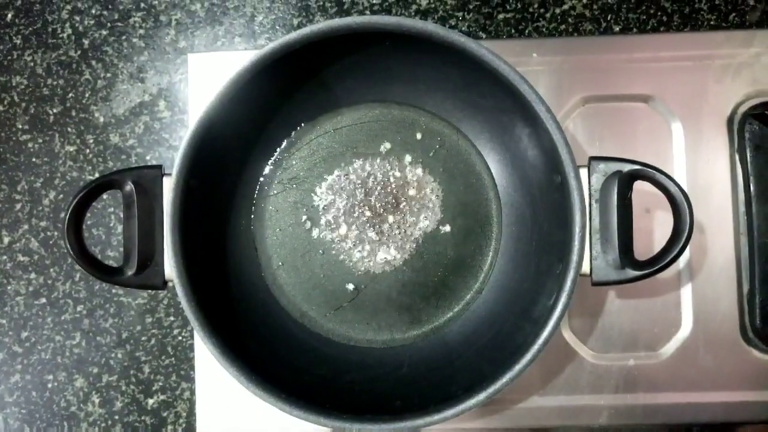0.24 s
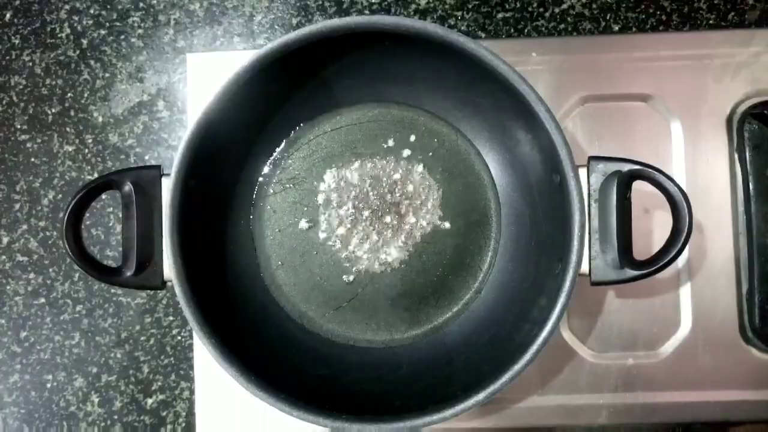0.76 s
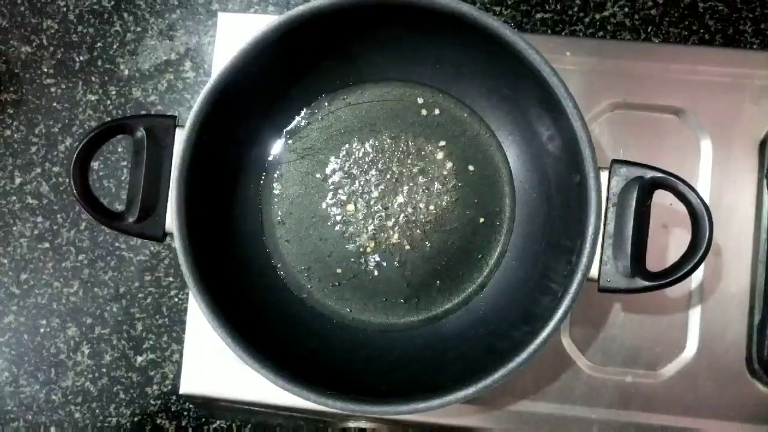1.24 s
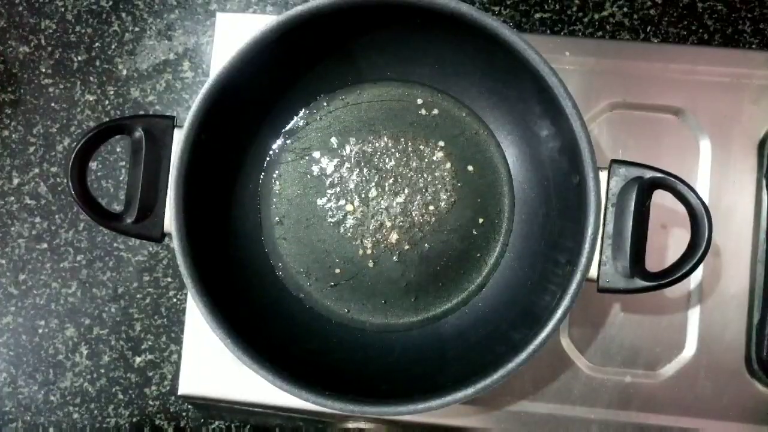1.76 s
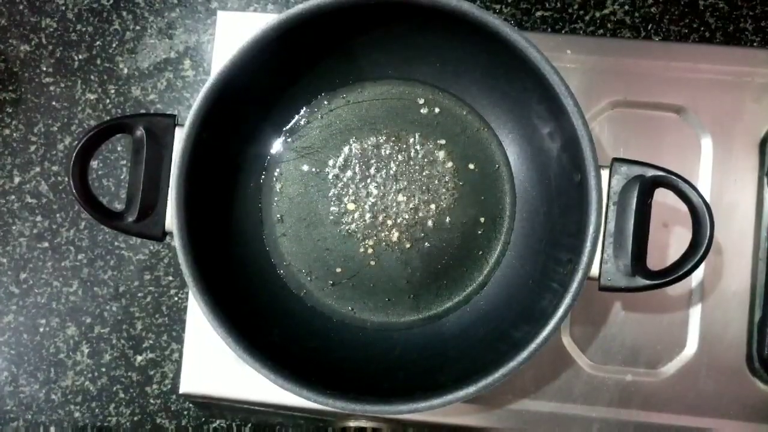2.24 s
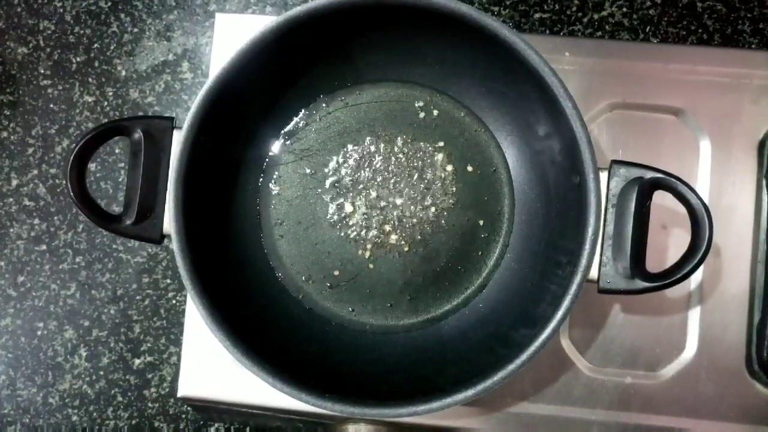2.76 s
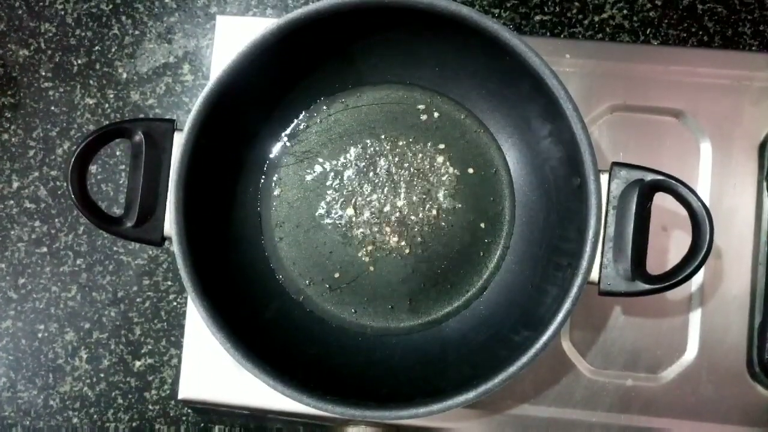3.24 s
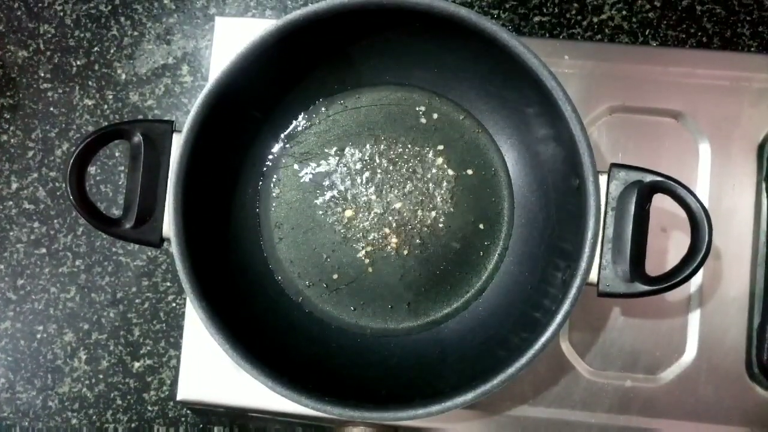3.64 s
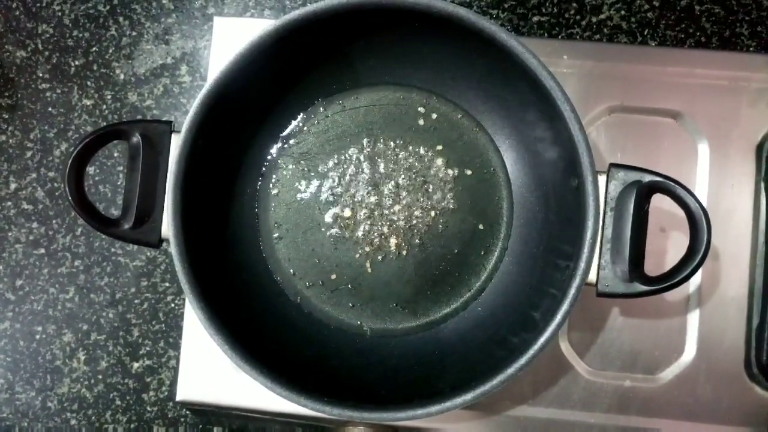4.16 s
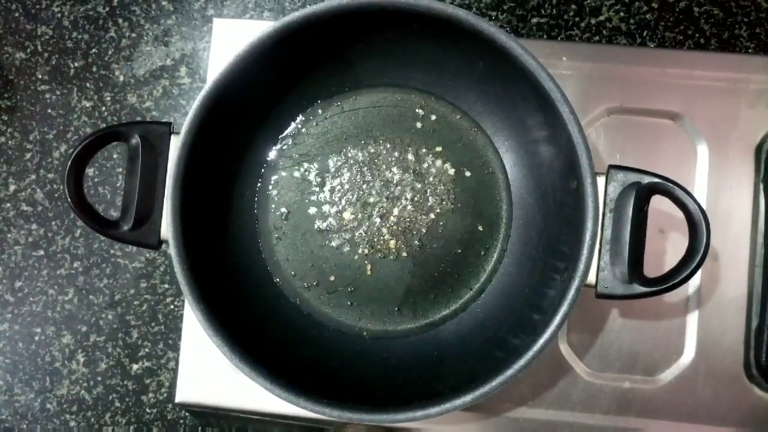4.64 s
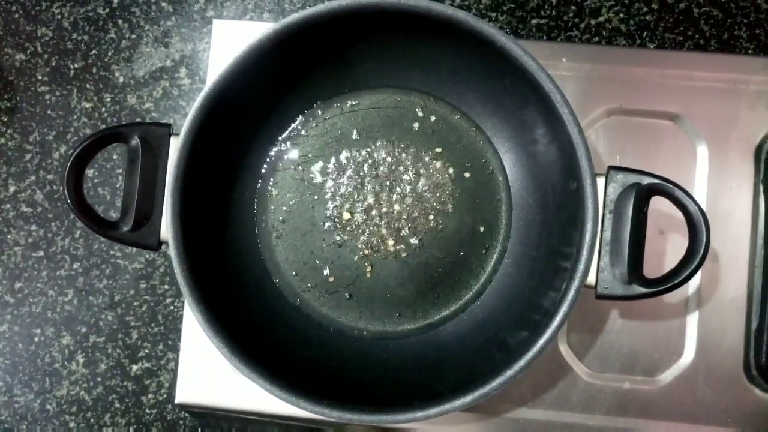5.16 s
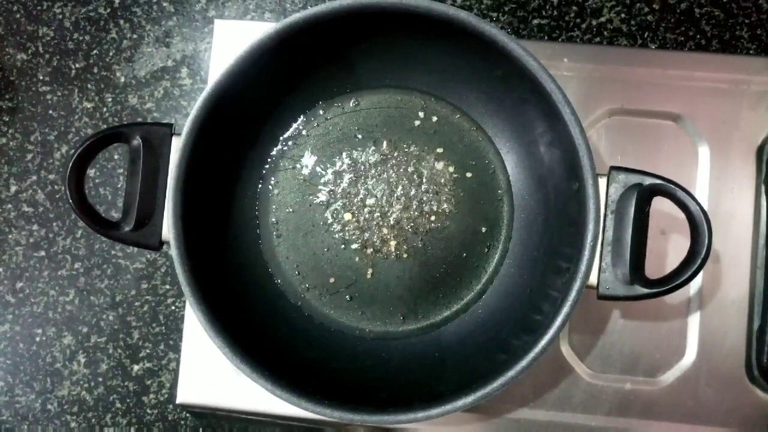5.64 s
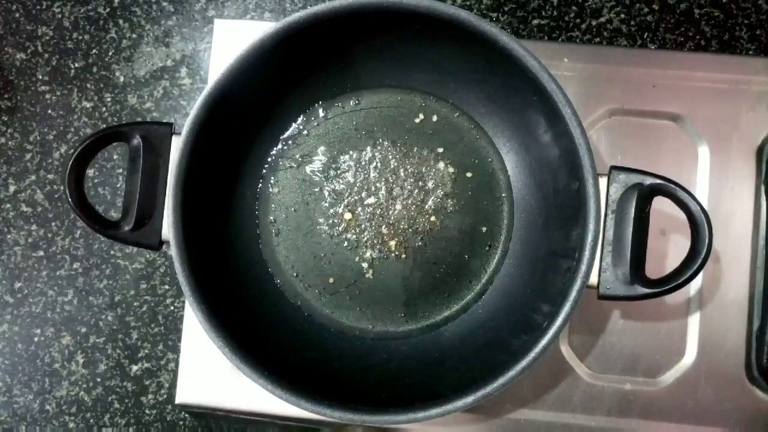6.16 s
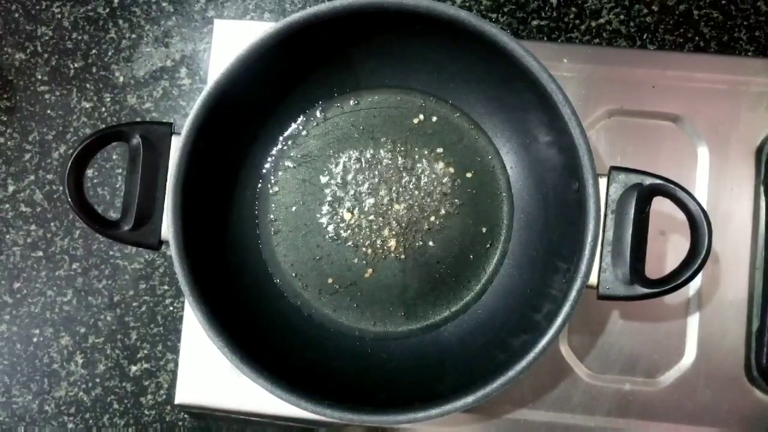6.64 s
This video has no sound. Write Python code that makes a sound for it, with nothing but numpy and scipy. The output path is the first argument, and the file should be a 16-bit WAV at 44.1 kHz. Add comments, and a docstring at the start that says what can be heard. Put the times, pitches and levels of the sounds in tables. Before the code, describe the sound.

Seeds and lentils fry in oil. At first there is only a faint, fine hiss with breathy wheezes and a low flame roar. At about 1.4 seconds, sharp steam pops start abruptly and keep coming, dozens each second, uneven in loudness, over sizzling and sputtering oil. The close stereo pickup favours the left, with little room echo and a softened extreme top.

```python
"""A kitchen stove: mustard seeds and lentils fry in hot oil in a metal pot. At first a fine hiss with faint
wheezes lies over the burner, coloured noise with a low rumble. Then steam bursts from the seeds in sharp pops,
noise jets and clicks ringing a damped cavity; wet spurts of filtered noise and gurgles of short rising tones
join a bed of fizz made of noise and tiny spits. The left microphone faces the pot; the right one hears the
bursts weaker and smeared, in its own duller colour."""
import sys
import numpy as np
from scipy import signal
from scipy.fft import rfft, irfft, next_fast_len
from scipy.io import wavfile

SR = 44100
rng = np.random.default_rng(int(sys.argv[2]) if len(sys.argv) > 2 else 0)


def bounce(signal):
    """Save signal as a 16-bit WAV file at the path given by the first command-line argument."""
    frames = np.transpose(np.atleast_2d(signal))
    limited = np.clip(frames, -1, 1)
    pcm = np.round(limited * 32767).astype(np.int16)
    wavfile.write(sys.argv[1], SR, pcm)


N = 304731
TIME = np.arange(N) / SR
FREQS = np.maximum(np.arange(N // 2 + 1) * SR / N, 1)

# loud bursts of steam pockets: (time [s], level before trim [dB], pitch [Hz], treble snap [dB])
LOUD_POPS = [(1.385, -24, 4240, -18), (1.404, -29, 5460, -11), (1.4216, -29, 5170, -11),
             (1.4467, -34, 5450, -14), (1.454, -29.5, 4500, -7.5), (1.5082, -29, 5300, -9),
             (1.5524, -29, 5650, -5.5), (1.5935, -30, 5520, -9), (1.6189, -35.5, 5430, -10),
             (1.6775, -24, 5500, -15), (1.7271, -23.5, 5470, -6), (1.7964, -29, 5870, -20),
             (1.8821, -29.5, 5200, -6), (1.9454, -27.5, 5250, -12.5), (2.0003, -26.5, 5950, -10),
             (2.009, -32, 5800, -11), (2.0254, -18, 5080, -26), (2.0771, -27.5, 5220, -20),
             (2.1363, -24.5, 3800, -22), (2.1514, -22.5, 3920, -26), (2.2225, -23, 5070, -17),
             (2.2608, -30.0, 5520, -9), (2.2752, -29, 5390, -10), (2.2854, -34, 5740, -7.5),
             (2.3337, -28.5, 5900, -12), (2.3589, -30.5, 5580, -6), (2.4712, -25, 6100, -9),
             (2.528, -19, 4060, -28), (2.5358, -26.5, 5150, -16), (2.5975, -22.5, 5170, -7.5),
             (2.648, -24.5, 5260, -10), (2.6589, -23.5, 5290, -14), (2.6813, -31, 5450, -19),
             (2.7402, -24.5, 5420, -18), (2.7804, -26.0, 4620, -24), (2.7924, -29.5, 5480, -7),
             (2.8654, -32.5, 6030, -6), (2.8715, -32, 5420, -17), (2.902, -18, 5240, -11),
             (2.92, -28, 5350, -14), (2.9275, -31, 5420, -6), (3.0279, -19.5, 4240, -16.5),
             (3.0477, -30, 5440, -12), (3.095, -19, 5560, -14), (3.118, -26.5, 4700, -16),
             (3.2171, -23, 5570, -9), (3.2688, -24.5, 5300, -11), (3.3009, -27.5, 5200, -20),
             (3.3671, -17.5, 4160, -25), (3.375, -29, 4800, -16), (3.4047, -26, 5720, -16),
             (3.4338, -20.5, 5900, -28), (3.4855, -18.5, 4680, -22), (3.494, -26.0, 5550, -21),
             (3.526, -21.5, 4900, -13), (3.5346, -29.5, 5350, -9), (3.5746, -26.5, 5940, -12),
             (3.5975, -22.5, 4270, -17), (3.643, -24, 5600, -24), (3.6577, -20, 5700, -18),
             (3.6753, -27, 5000, -24), (3.6998, -26.5, 5730, -18), (3.7103, -29, 5670, -8),
             (3.7342, -27.0, 4330, -24), (3.7672, -33, 5300, -22), (3.817, -33, 5560, -3),
             (3.873, -29.5, 4870, -9), (3.8811, -21.5, 4380, -17), (3.8895, -20.5, 4900, -16),
             (3.9033, -26, 5280, -11), (3.9151, -29, 5900, -6), (3.9392, -25.5, 5160, -14),
             (3.9654, -28.0, 4960, -18), (3.9805, -26.5, 5170, -11), (4.0231, -21.5, 4930, -27),
             (4.0357, -30.5, 5560, -21), (4.0862, -20, 4670, -17), (4.1469, -26, 5300, -24),
             (4.173, -27.0, 5100, -19), (4.2304, -26, 5560, -11), (4.2783, -18.5, 4550, -29),
             (4.2912, -26, 5900, -11), (4.3308, -30, 5460, -6), (4.365, -32, 5890, -14),
             (4.3726, -28, 4990, -17), (4.3864, -28, 5190, -19), (4.397, -25, 4740, -15),
             (4.4367, -25.5, 5350, -23), (4.4614, -24, 5700, -15), (4.5794, -23, 4880, -20),
             (4.6387, -26, 4670, -16), (4.6598, -20.5, 4700, -14.5), (4.687, -22, 5330, -13),
             (4.7065, -27.5, 5410, -17), (4.7533, -25.5, 5160, -12), (4.7837, -25.5, 5100, -15),
             (4.9363, -18.5, 5870, -6), (4.9816, -20.5, 5330, -15), (5.04, -26.5, 5230, -9),
             (5.0758, -26, 5360, -14), (5.0912, -18, 4970, -14), (5.1034, -29, 5090, -6),
             (5.1187, -36.5, 5780, 4), (5.2293, -28.0, 5300, -8), (5.2451, -30, 5760, -12),
             (5.2672, -28.5, 5680, -11), (5.2975, -25.5, 4470, -11), (5.307, -18, 5130, -21),
             (5.3255, -20.5, 4910, -17), (5.3467, -24, 5250, -22), (5.399, -22, 5350, -13),
             (5.4163, -19.5, 4920, -19), (5.4263, -28, 5200, -19), (5.4755, -23.5, 5440, -22),
             (5.5577, -28, 4880, -20), (5.6197, -26, 5400, -12), (5.629, -32, 4750, -6),
             (5.6726, -29.5, 5600, -8), (5.7093, -29.5, 4980, -13), (5.723, -31, 5300, -15),
             (5.7972, -20.5, 4830, -27), (5.8285, -29, 5530, -16), (5.9253, -26.5, 5570, -10),
             (5.9568, -24.5, 5160, -13), (5.9993, -28, 5150, -17), (6.0196, -25.0, 5460, -13),
             (6.0655, -22.5, 5670, -13), (6.1262, -22.5, 4700, -13), (6.1944, -32, 5700, -24),
             (6.2084, -22.5, 5230, -31), (6.2503, -29, 5940, -9), (6.2928, -25, 5500, -14),
             (6.3006, -30, 5020, -10), (6.3337, -24, 5660, -14), (6.3798, -24.5, 5700, -11),
             (6.4348, -19.5, 4300, -16.5), (6.4573, -23, 5200, -21), (6.5133, -26, 5640, -5.5),
             (6.5392, -29, 5140, -21), (6.5538, -22, 5200, -16), (6.5641, -29, 5050, -22),
             (6.5893, -20.5, 5370, -20), (6.597, -25, 5200, -22), (6.6132, -25.5, 4560, -11),
             (6.6612, -26, 5090, -16), (6.6694, -23.5, 4900, -21), (6.6988, -25.5, 5150, -11),
             (6.7221, -27.0, 5220, -16), (6.729, -31, 4980, -13), (6.8245, -25, 5040, -14.5),
             (6.8696, -21.0, 5220, -34)]
POPPING_FROM_S = 1.382  # the popping begins
SMALL_POP_HZ = 5300  # typical pitch of a lesser burst, and the yardstick for the size of every burst


def from_db(db):
    """Decibels to gain."""
    return 10 ** (np.asarray(db) / 20)


def rms_one(x):
    """Scale to unit power."""
    return x / np.sqrt(np.mean(x ** 2) + 1e-20)


def in_time(rows):
    """Each column of a curve at every sample."""
    s, *columns = np.transpose(rows)
    return [np.interp(TIME, s, c) for c in columns]


def over_hz(points):
    """A spectrum table at every frequency, joined along a log pitch axis."""
    hz, value = np.transpose(points)
    return np.interp(np.log(FREQS), np.log(hz), value)


def colour(x, curve_db):
    """Filter by a gain given at every frequency."""
    size = next_fast_len(N, True)
    gain = np.interp(np.arange(size // 2 + 1) * SR / size, FREQS, from_db(curve_db))
    return irfft(rfft(x, size) * gain, size)[..., :N]


def band(x, low_hz, high_hz, order=2):
    """Causal band-pass."""
    edges_hz = [low_hz, min(high_hz, SR / 2 - 1)]
    return signal.sosfilt(signal.butter(order, edges_hz, "band", fs=SR, output="sos"), x)


def drift(rate):
    """Slow random curve of spread 1: noise rolled off above rate [Hz]."""
    step, size = 40, 8192  # samples between points, number of points
    hz = np.arange(size // 2 + 1) * SR / step / size
    slow = irfft(rfft(rng.standard_normal(size)) / (1 + (hz / rate) ** 2))
    return np.interp(np.arange(N) / step, np.arange(size), rms_one(slow))


def diffuse_noise():
    """Stereo noise, alike in the bass and nearly unrelated in the treble."""
    # likeness of the two microphones: (frequency [Hz], correlation [0-1])
    likeness = [(70, 1), (130, 0.92), (300, 0.87), (630, 0.78), (1200, 0.15), (3000, 0.06)]
    alike = np.clip(over_hz(likeness), 0, 1)
    mid, side = rfft(rng.standard_normal((2, N)))
    return irfft(np.sqrt(1 + alike) * mid + np.sqrt(1 - alike) * side * [[1], [-1]], N)


def hollows_db():
    """The lift that the hollow resonances give at every frequency."""
    # hollows of pot and stove: (centre [Hz], width [Hz], lift [dB])
    hollows = [(269, 38, 4.5), (347, 11, 10.5), (523.8, 10.4, 7.5), (611.2, 33, 9.5), (1107, 52, 7.5),
               (1582, 51, 9), (2110, 200, 8)]
    return sum(db / (1 + (2 * (FREQS - hz) / width) ** 2) for hz, width, db in hollows)


def burner():
    """The flame's roar sounds through the hollows of pot and stove, over a low rumble; both flicker."""
    # low background levels, mostly lower from 1.4 s on:
    # (time [s], roar before trim [dB], rumble before trim [dB])
    flame_levels = [(0.0, -45.5, -52), (0.96, -44.5, -48), (1.38, -43, -53), (1.42, -51.5, -57.5),
                    (2.02, -49, -52), (3.35, -51, -55.5), (3.37, -43, -47), (3.39, -53.5, -55.5),
                    (4.11, -51.5, -57.5), (4.15, -41.5, -50), (4.2, -52, -55), (4.73, -49, -57.5),
                    (4.93, -50, -53), (5.5, -52, -57), (5.58, -43, -50.5), (5.7, -55.5, -64),
                    (5.75, -46.5, -55), (6.37, -50, -54), (6.91, -51.5, -55.5)]
    # flame spectrum ahead of the hollows: (frequency [Hz], relative level [dB])
    roar_spectrum = [(60, -31), (150, -9), (200, -0.5), (250, 1), (350, 0.5), (480, -2), (750, -4),
                     (1300, -8), (2200, -13.5), (4000, -16), (9000, -33), (13500, -47)]
    # low rumble spectrum: (frequency [Hz], relative level [dB])
    rumble_spectrum = [(20, -6), (38, -26), (50, 0.5), (58, -8), (72, 5), (86, -4), (104, 7.5), (122, -1),
                       (145, -17), (260, -55)]
    roar_db, rumble_db = in_time(flame_levels)
    roar = rms_one(colour(diffuse_noise(), over_hz(roar_spectrum) + hollows_db()))
    rumble = rms_one(colour(diffuse_noise(), over_hz(rumble_spectrum)))
    flicker_db = 1.16 * drift(rate=20.0)
    roar_gain = from_db(roar_db + 1.0 + flicker_db)
    rumble_gain = from_db(rumble_db + 2.0 + .5 * flicker_db)
    return roar_gain * roar + rumble_gain * rumble


def wheezes():
    """Short, breathy swells of narrow hiss."""
    # faint wheezes in the early hiss: (time [s], level [dB], pitch [Hz])
    wheeze_rows = [(.26, -49, 4490), (.33, -52.5, 3800), (.86, -50.5, 3890)]
    out = 0
    for s, level_db, hz in wheeze_rows:
        hiss = rms_one(band(rng.standard_normal((2, N)), hz / 1.022, hz * 1.022))
        swell = np.exp(-((TIME - s) / 0.066) ** 2)
        out = out + from_db(level_db) * hiss * swell
    return out


def oil_levels():
    """Fizz and sputter in dB: powers of the simmer, the steady bed and spurts that rise fast, hold and die away."""
    # steady bed of frying: (time [s], fine fizz before trim [dB], wet sputter before trim [dB])
    bed_levels = [(1.4, -36, -40.5), (1.6, -38, -46), (1.87, -43, -48), (2.08, -38, -60.0), (2.3, -39, -55),
                  (2.75, -36.5, -61), (2.97, -42, -47), (3.2, -39, -44), (3.55, -36, -48), (3.8, -39, -56),
                  (4.2, -33.5, -48), (4.55, -38.5, -50), (4.9, -41.5, -53), (5.25, -33.5, -46),
                  (5.68, -44.5, -55), (6.1, -38, -47.5), (6.45, -42, -48.5), (6.91, -39, -54.9)]
    # a seed splits and vents its moisture in a spurt:
    # (time [s], length [s], fine fizz before trim [dB], wet sputter before trim [dB])
    spurt_rows = [(1.647, 0.062, -37.5, -44.5), (2.006, 0.054, -32, -40.5), (2.118, 0.041, -48, -34.5),
                  (2.47, 0.025, -34.5, -58.0), (2.516, 0.009, -44, -33.5), (2.633, 0.027, -41, -42),
                  (2.893, 0.026, -43, -58.0), (3.033, 0.051, -36.5, -44.7), (3.11, 0.028, -36, -45),
                  (3.356, 0.005, -33, -32.5), (3.446, 0.019, -39, -54), (3.584, 0.079, -37, -38),
                  (3.66, 0.018, -33, -32), (3.698, 0.057, -37, -39), (3.861, 0.011, -31, -32),
                  (4.019, 0.024, -29.5, -43.9), (4.126, 0.022, -50, -40.5), (4.441, 0.024, -32.5, -33),
                  (4.633, 0.028, -44, -36.5), (4.764, 0.066, -36.5, -42.5), (4.955, 0.086, -36, -53),
                  (5.328, 0.018, -36, -33.2), (5.408, 0.016, -30.5, -42), (5.545, 0.025, -39, -37.5),
                  (5.798, 0.019, -39, -58), (5.914, 0.007, -34, -45), (5.945, 0.034, -36, -40),
                  (6.534, 0.054, -35.5, -42.5), (6.576, 0.11, -36.7, -46), (6.843, 0.014, -33.3, -60)]
    simmer_fizz_db, simmer_sputter_db = -44, -51.5  # the hiss that the hot oil always keeps up
    attack_s, release_s = 0.011, 0.042
    bed_db, wet_bed_db = in_time(bed_levels)
    popping = TIME > POPPING_FROM_S
    fizz = from_db(simmer_fizz_db) ** 2 + popping * from_db(bed_db) ** 2
    sputter = from_db(simmer_sputter_db) ** 2 + popping * from_db(wet_bed_db) ** 2
    for s, length_s, fizz_db, sputter_db in spurt_rows:
        rise = np.clip((TIME - s) / attack_s, 0, 1)
        flow = rise * np.exp(-np.clip((TIME - s - length_s) / release_s, 0, 20))
        fizz = fizz + (from_db(fizz_db) * flow) ** 2
        sputter = sputter + (from_db(sputter_db) * flow) ** 2
    return 10 * np.log10(fizz), 10 * np.log10(sputter)


def crackle(per_s, spread_db, jet_ms):
    """Pinhead bubbles bursting at the surface: very short noise ticks of uneven strength."""
    at = np.flatnonzero(rng.random(N) < per_s / SR)
    powers = from_db(spread_db * np.minimum(rng.exponential(1, len(at)), 2.5)) ** 2
    fade = np.exp(-1000 / (jet_ms * SR))
    envelope = np.sqrt(signal.lfilter([1], [1, -fade], np.bincount(at, powers, N) + 1e-18))
    return rms_one(envelope * rng.standard_normal((2, N)))


def bubbles(per_s, spread_db, width, jet_ms, count=16):
    """Small spits of uneven strength at random moments, each a brief noise jet in one of many pitch bands."""
    at = np.flatnonzero(rng.random(N) < per_s / SR)
    powers = from_db(spread_db * np.minimum(rng.exponential(1, len(at)), 3)) ** 2
    dealt = rng.integers(0, count, len(at))  # the band of each spit
    out = np.zeros((2, N))
    fade = np.exp(-1000 / (jet_ms * SR))
    for k, hz in enumerate(np.geomspace(1500, 12000, count)):
        starts = np.bincount(at[dealt == k], powers[dealt == k], N) + 1e-18
        envelope = np.sqrt(signal.lfilter([1], [1, -2 * fade, fade ** 2], starts))
        jets = envelope * rng.standard_normal((2, N))
        out += band(jets, hz / (1 + width), hz * (1 + width))
    return rms_one(out)


def patchy(x, depth_db, rate, count=14):
    """Each narrow band swells and fades on its own, at random."""
    size = next_fast_len(N, True)
    spectrum, hz = rfft(x, size), np.arange(size // 2 + 1) * SR / size
    centres = np.geomspace(1200, 13000, count)
    # overlapping triangles that add up to the whole spectrum
    bands = (irfft(spectrum * np.interp(hz, centres, one), size)[:, :N] for one in np.eye(count))
    return sum(part * from_db(depth_db * drift(rate)) for part in bands)


def frying(fizz_db, sputter_db, lively):
    """Fine bubbles fizz and larger ones sputter; the livelier the oil, the more single spits stand out."""
    # fine fizz: (frequency [Hz], relative level [dB])
    fizz_spectrum = [(700, -11), (2000, -8), (3200, -11), (3900, -0.5), (5000, 3.5), (5750, 6), (6600, -2),
                     (7150, -13), (8000, -16.5), (9500, -12), (11500, -13.5), (13000, -19.5), (13500, -62)]
    # wet sputter ahead of the hollows: (frequency [Hz], relative level [dB])
    sputter_spectrum = [(500, -15.5), (1100, -5), (1600, -26), (2150, -9), (2700, -1.5), (3350, 6.5),
                        (4100, 3), (5500, -57), (9000, -62)]
    ticks = lively * crackle(per_s=100, spread_db=-9.0, jet_ms=1.0)
    spits = lively * bubbles(per_s=600, spread_db=-0.8, width=0.16, jet_ms=0.83)
    plops = lively * bubbles(per_s=460, spread_db=0.5, width=0.083, jet_ms=1.0)
    fine = 0.64 * rng.standard_normal((2, N)) + .7 * spits + 0.46 * ticks
    wet = 1.11 * rng.standard_normal((2, N)) + 1.38 * plops + 0.043 * ticks
    fizz = from_db(fizz_db - 1.53) * rms_one(colour(fine, over_hz(fizz_spectrum)))
    wet_colour_db = over_hz(sputter_spectrum) + hollows_db()
    sputter = from_db(sputter_db - 1.2) * rms_one(colour(wet, wet_colour_db))
    clumps = from_db(0.71 * lively * drift(rate=15))  # bubbles come in clusters
    return clumps * patchy(fizz + sputter, depth_db=1.28 + 1.27 * lively, rate=17.0)


def puffs(sputter_db):
    """Dull air noise in the hollows of the pot follows the sputter, so the wettest spurts puff most."""
    air = rms_one(colour(band(diffuse_noise(), 140, 1100, order=2), hollows_db()))
    return from_db(sputter_db - 14) * air


def gurgles():
    """A crevice blows a quick string of bubbles of nearly one size; each rings briefly, rising in pitch."""
    # strings of ringing bubbles: (time [s], length [s], level before the ring's envelope [dB], pitch [Hz])
    gurgle_rows = [(2.132, 0.035, -36, 3420), (3.66, 0.1, -42, 3420), (4.132, 0.034, -27, 3410),
                   (4.456, 0.035, -37.5, 2070), (4.441, 0.042, -31, 3040), (5.341, 0.04, -38, 3450)]
    bubbles_per_s, ring_s = 300, 0.0068
    scatter_octaves, rise_per_s = 0.069, 1  # scatter either way; rise as a share of the pitch
    out, t = np.zeros((2, N + SR)), TIME[:SR // 25]
    for s, length_s, level_db, hz in gurgle_rows:
        count = max(round(bubbles_per_s * length_s), 1)
        for when, size, left, right in rng.random((count, 4)):
            pitch = hz * 2 ** (scatter_octaves * (2 * size - 1))
            start_phase = np.array([[left], [right]])
            phase = 2 * np.pi * (pitch * t * (1 + rise_per_s * t / 2) + start_phase)
            ring = np.sin(phase) * (np.exp(-t / ring_s) - np.exp(-10 * t / ring_s))
            start = round((s + when * length_s) * SR)
            out[:, start:start + len(t)] += from_db(level_db) * ring
    return out[:, :N]


def dips():
    """Gain of the background: brief smooth dips, a short one round each loud burst, and a fast flutter."""
    # brief dips of the whole background: (time [s], half length [s], depth [dB])
    dip_rows = [(1.427, 0.036, 7.5), (1.878, 0.033, 7), (2.362, 0.018, 8), (2.497, 0.027, 8),
                (2.895, 0.014, 3.5), (3.347, 0.005, 7.5), (4.181, 0.019, 7.5), (4.336, 0.017, 6),
                (4.529, 0.018, 9), (5.394, 0.0042, 11), (5.632, 0.017, 7), (5.694, 0.011, 7),
                (6.701, 0.012, 15)]
    pop_dip_db, pop_dip_s, pop_dip_lead_s = 3, 0.007, 0.0021  # depth, half length, how early
    dip_db = sum(depth_db * np.exp(-((TIME - s) / half_s) ** 2) for s, half_s, depth_db in dip_rows)
    centres = np.sort(np.array(LOUD_POPS)[:, 0]) - pop_dip_lead_s
    nearest = centres[np.searchsorted((centres[1:] + centres[:-1]) / 2, TIME)]
    dip_db = np.maximum(dip_db, pop_dip_db * np.exp(-((TIME - nearest) / pop_dip_s) ** 2))
    flutter_db = 2.5 * drift(rate=52) * (TIME > POPPING_FROM_S)
    return from_db(flutter_db - dip_db)


def kitchen(x, t60, echo_s, echo_db, tail_db):
    """One echo from a near wall, then the diffuse ring of a small hard room."""
    t = TIME[:SR // 2]
    tail = rng.standard_normal((2, len(t))) * from_db(-60 * t / t60) * (t > echo_s)
    echo = rng.standard_normal((2, len(t))) * np.exp(-np.abs(t - echo_s) / 0.0005)
    response = (from_db(tail_db) * rms_one(tail) + from_db(echo_db) * rms_one(echo)) / np.sqrt(len(t))
    return signal.fftconvolve(x[None], response, axes=1)[:, :N]


def small_pops(lively):
    """Rows like those of LOUD_POPS: steam builds up between lesser bursts, so their gaps are loosely even."""
    gap, size, pitch, snap = rng.standard_normal((300, 4)).T
    times = POPPING_FROM_S + np.cumsum(0.035 * np.exp(0.5 * gap))  # median gap 0.035 s
    vigour_db = 10 * np.log10(np.interp(times, TIME, lively))  # stronger the livelier the oil
    levels_db = -39 + 2.5 * size + vigour_db
    pitches_hz = SMALL_POP_HZ * 2 ** (0.16 * pitch)  # scatter in octaves
    rows = np.transpose([times, levels_db, pitches_hz, -13.5 + 3.8 * snap])
    distance_s = np.abs(times[:, None] - np.array(LOUD_POPS)[:, 0]).min(axis=1)
    rested = distance_s > 0.0042  # no lesser burst comes this close to a loud one
    return rows[rested & (times < TIME[-1])]


def cavity(burst, hz, width):
    """Ring of a small damped cavity (causal band-pass); width is a share of the pitch."""
    ratio = np.maximum(np.arange(len(burst) // 2 + 1) * SR / len(burst), 1) / hz
    q = 1j * (ratio - 1 / ratio) / width
    return rms_one(irfft(rfft(burst) / (q * q + np.sqrt(2) * q + 1)))


def pop(level_db, hz, snap_db, rise_ms, decay_ms, crack, width):
    """Steam jets out and the oil skin cracks in flicks, ringing the cavity; low pockets vent longer and plop."""
    stutter_ms, stutter_share = 0.99, 0.75  # mean spacing of side flicks, spread of their strength
    plop_db, plop_db_per_octave = -21, 30  # wet plop at the typical pitch, and its growth as the pitch falls
    ms = np.arange(-200, 312) / SR * 1000
    bulk = SMALL_POP_HZ / hz
    envelope = np.exp(-np.abs(ms) / np.where(ms < 0, rise_ms, decay_ms) / bulk ** 2)
    jet = envelope * rng.standard_normal(len(ms))
    # the main crack at 0 ms, with a weaker or equal flick of either sign before and after it
    flick_ms = stutter_ms * np.array([-1, 1]) * (.5 + rng.random(2))
    early, late = np.argmin(np.abs(ms[:, None] - flick_ms), axis=0)
    flicks = 1.0 * (ms == 0)
    flicks[[early, late]] += np.clip(stutter_share * rng.standard_normal(2), -1, 1)
    burst = jet / np.sqrt(np.sum(jet ** 2)) + crack / bulk ** 2 * flicks
    plop_gain = from_db(min(plop_db + plop_db_per_octave * np.log2(bulk), 0))
    body = rms_one(cavity(burst, hz, width=width) + plop_gain * cavity(burst, 3490, width=.2))
    snap = from_db(snap_db) * cavity(burst, 9600, width=.42)
    thud = from_db(-19.0) * cavity(burst, 1400, width=1.2)
    # the level is that of the body's energy spread over 5 ms
    return from_db(level_db) * (body + snap + thud) * np.sqrt(5 / np.ptp(ms))


def pops(rows):
    """Each burst reaches the left microphone crisply, and the right one smeared after glancing round the pot."""
    out = np.zeros((2, N + SR))
    for s, level_db, hz, snap_db in rows:
        jet_ms = 0.63 * from_db(4 * rng.standard_normal())  # base length, scattered by 4 dB
        near = pop(level_db + 0.27, hz, snap_db, jet_ms * 1.93, jet_ms * 1.6, crack=1.25, width=0.31)
        far = pop(level_db - 9.0, hz, snap_db, jet_ms * 1.1, jet_ms * 6.6, crack=0.12, width=0.18)
        start = round(s * SR) - np.argmax(np.abs(near))  # the near peak falls on the given time
        out[:, start:start + len(near)] += [near, far]
    return out[:, :N]


def scene():
    """All sources in the kitchen; the right microphone hears them in its own colour, mostly duller in the upper
    treble."""
    # colour of the right microphone against the left: (frequency [Hz], gain [dB])
    right_colour = [(900, 0), (1700, 0.5), (2500, 5), (3300, 0), (4000, -3), (5000, -11), (5800, -16.5),
                    (6500, -6), (8000, -7.5), (11000, -8), (13000, -16)]
    calm_db, lively_range_db = -46.5, 12  # fizz level at which spitting grows, and the rise to full spitting
    fizz_db, sputter_db = oil_levels()
    lively = np.clip((fizz_db - calm_db) / lively_range_db, .05, 1)
    dip_gain = dips()
    background = burner() + wheezes() + frying(fizz_db, sputter_db, lively) + puffs(sputter_db) + gurgles()
    bursts = pops(LOUD_POPS) + dip_gain * pops(small_pops(lively))
    room = kitchen(bursts[0], t60=0.13, echo_s=0.0091, echo_db=-42.0, tail_db=-22.0)
    left, right = bursts + dip_gain * (room + background)
    return np.array([left, colour(right, over_hz(right_colour))])


def record(dry):
    """The top is cut steeply above 13.6 kHz."""
    return signal.sosfilt(signal.butter(16, 13600, fs=SR, output="sos"), dry)


dry = scene()
out = record(dry)
bounce(out)
```